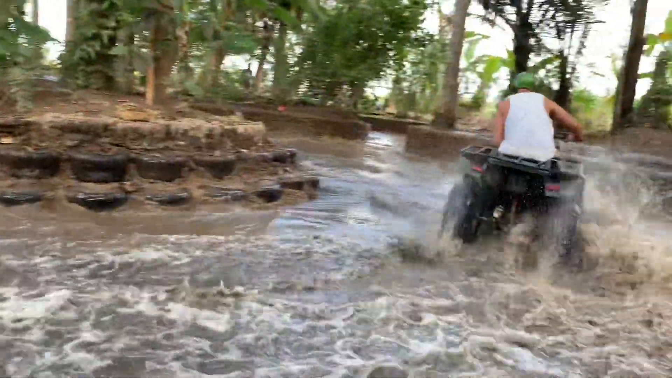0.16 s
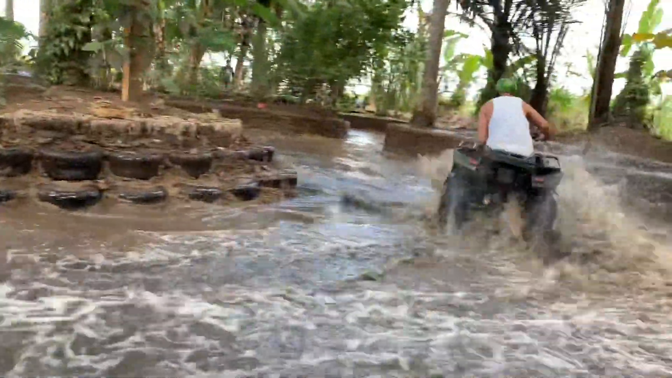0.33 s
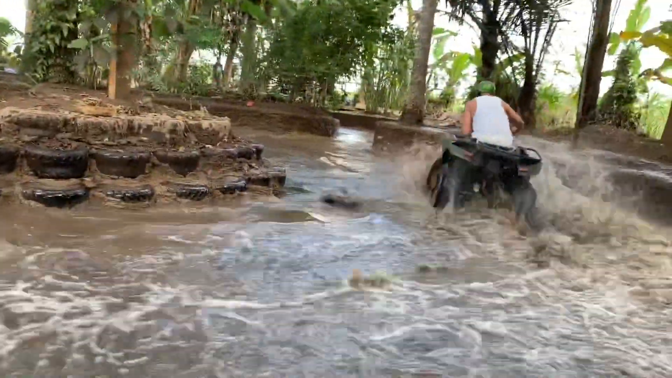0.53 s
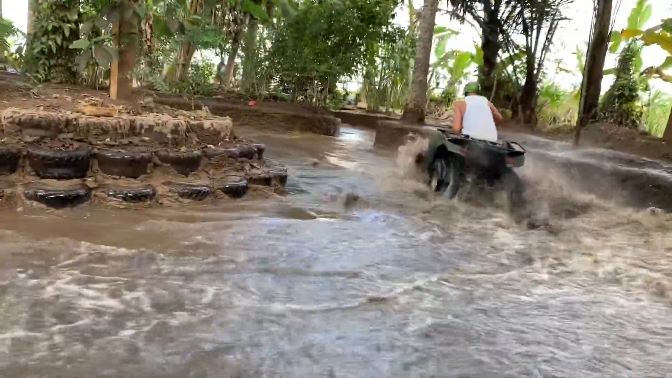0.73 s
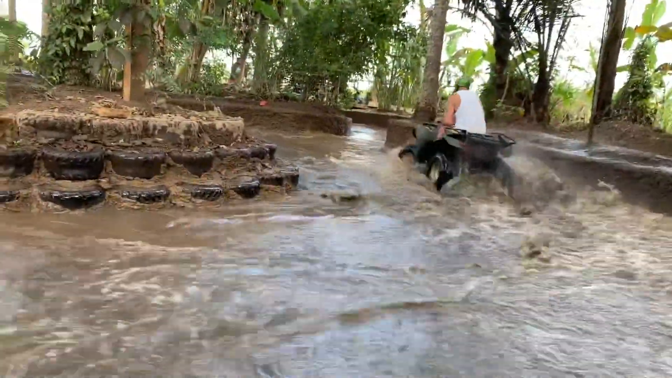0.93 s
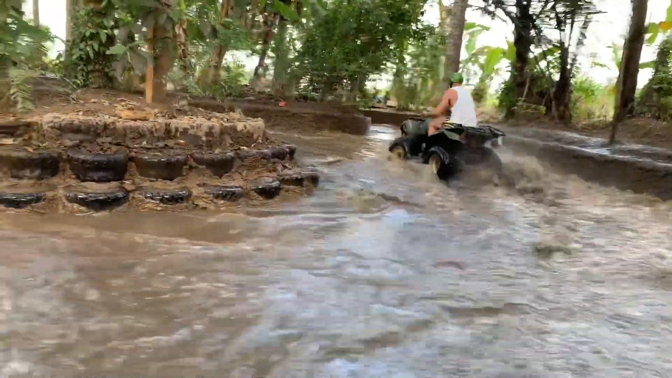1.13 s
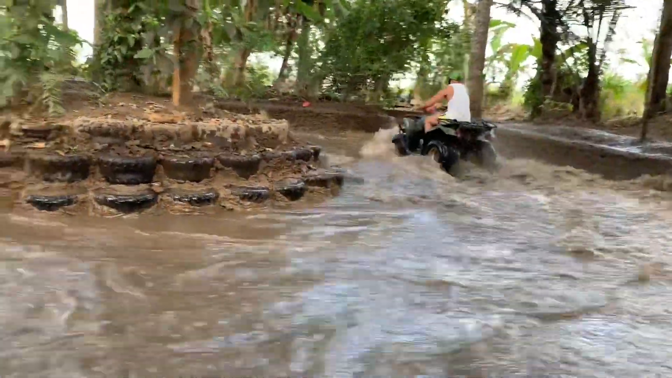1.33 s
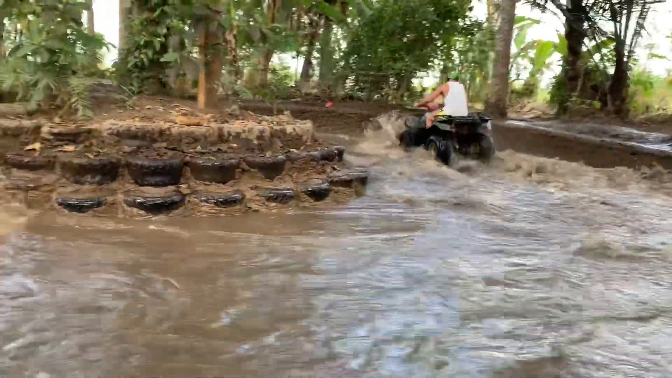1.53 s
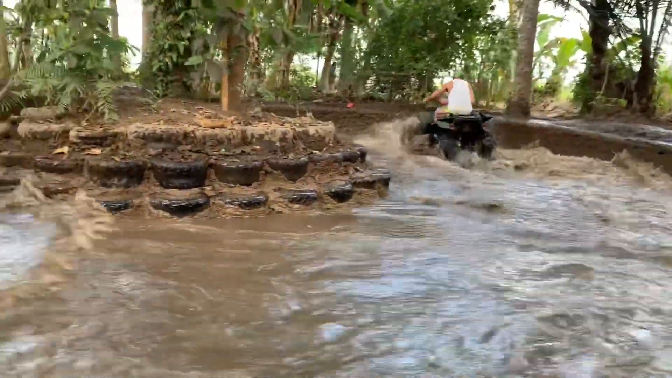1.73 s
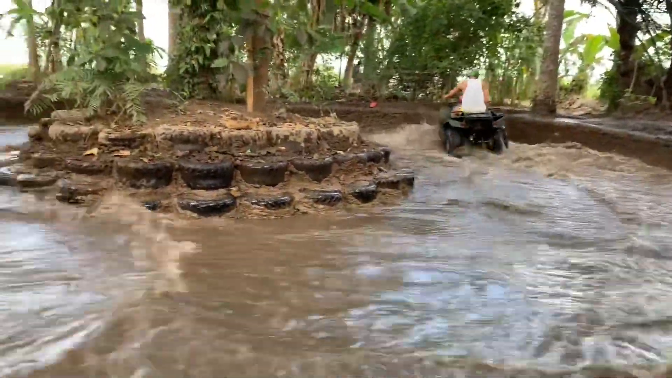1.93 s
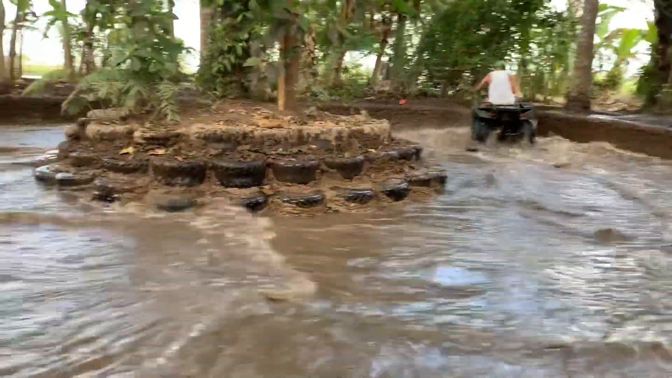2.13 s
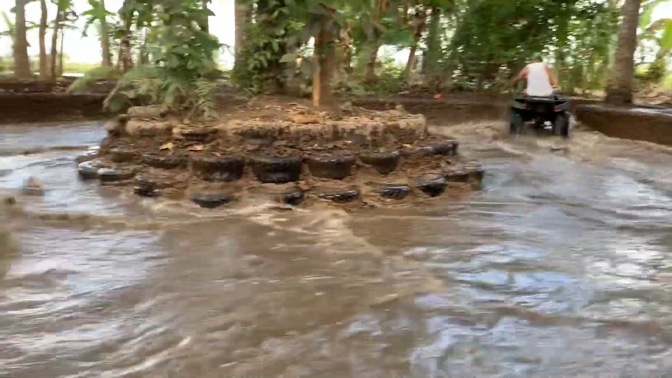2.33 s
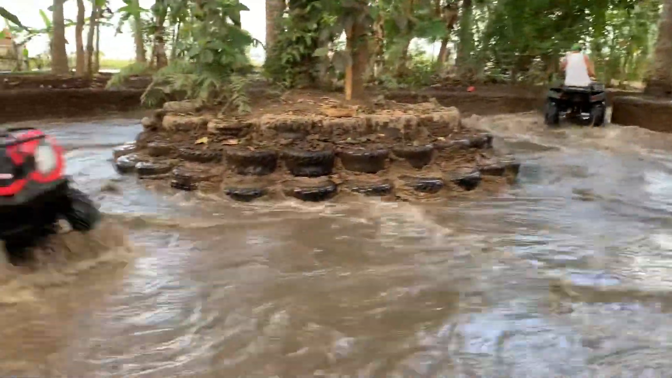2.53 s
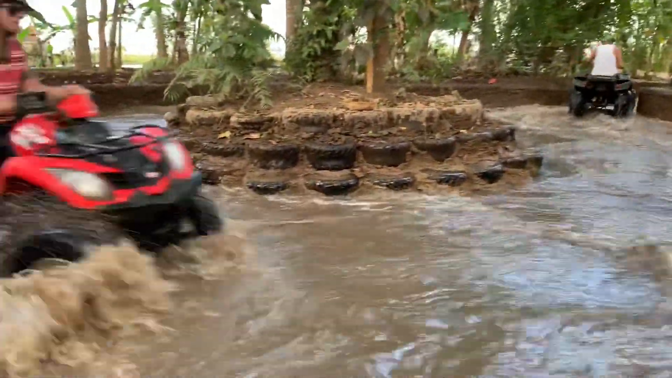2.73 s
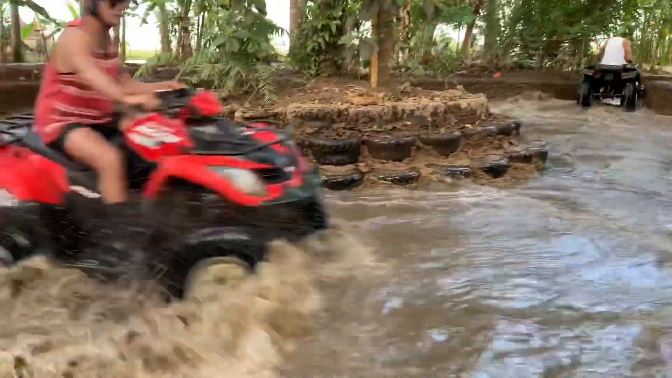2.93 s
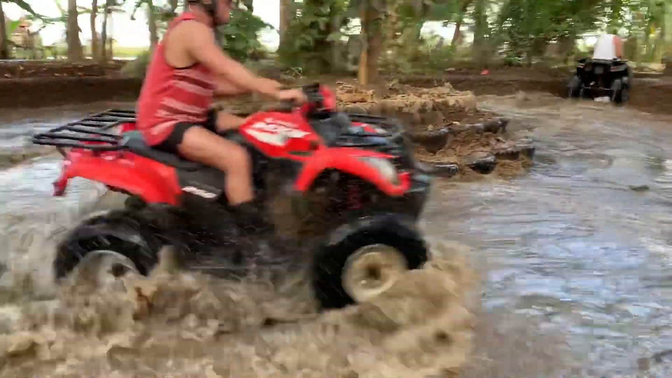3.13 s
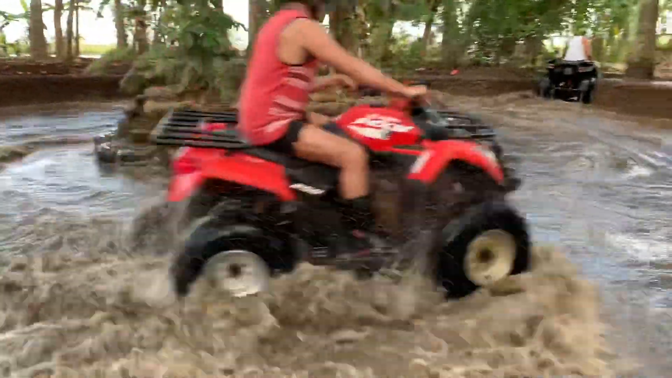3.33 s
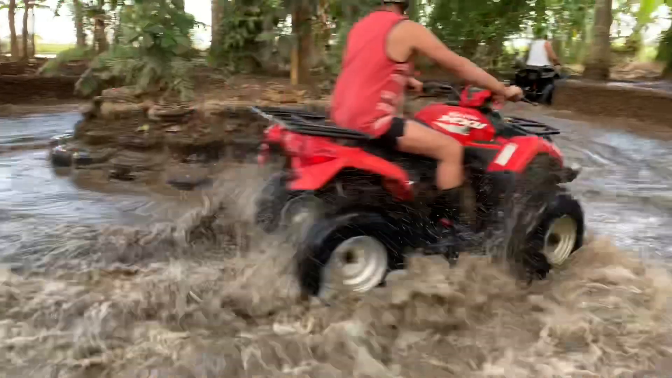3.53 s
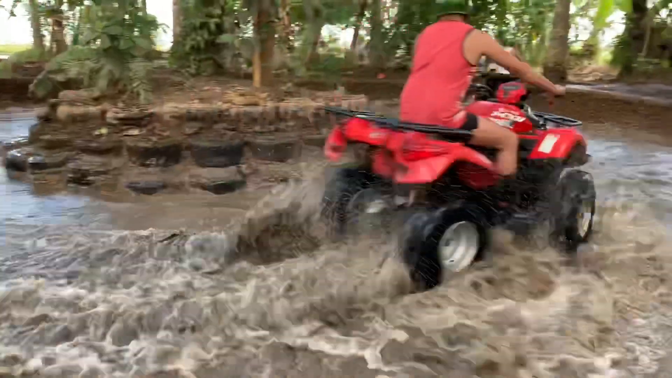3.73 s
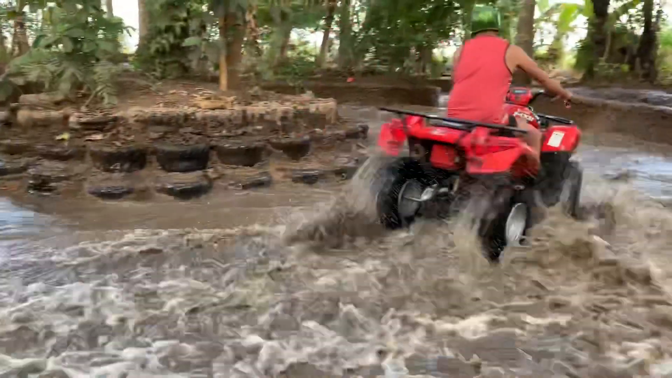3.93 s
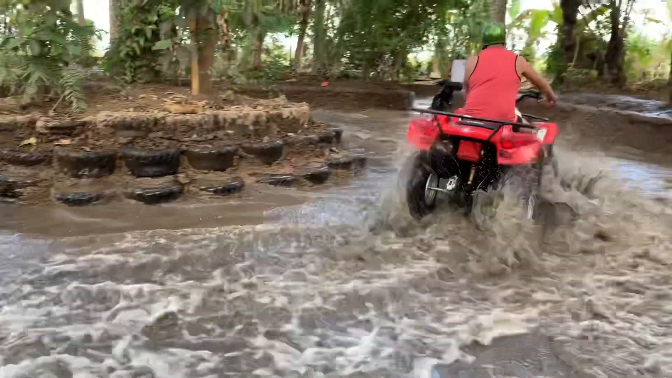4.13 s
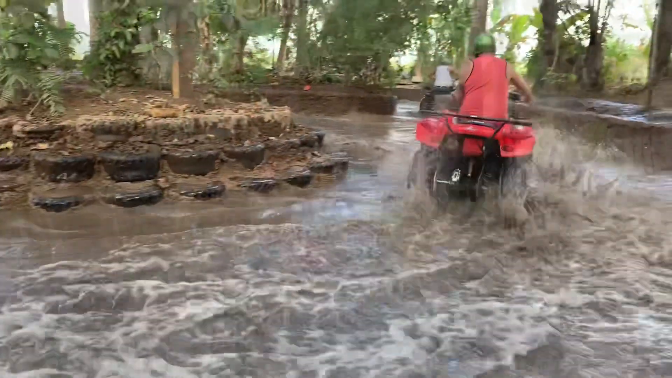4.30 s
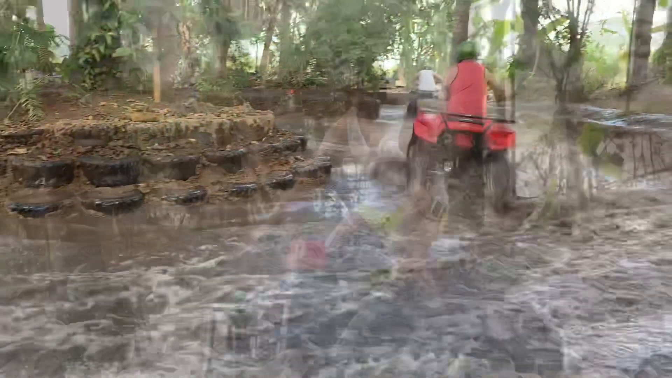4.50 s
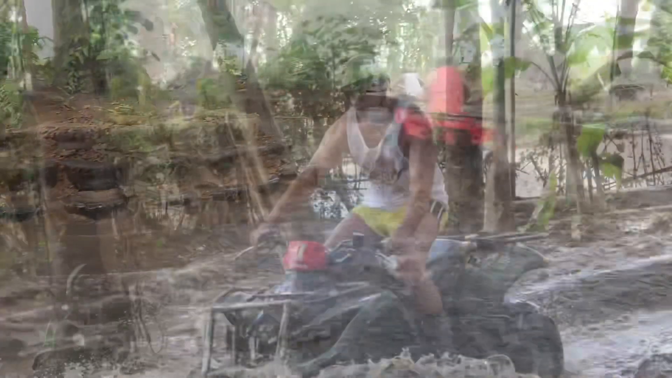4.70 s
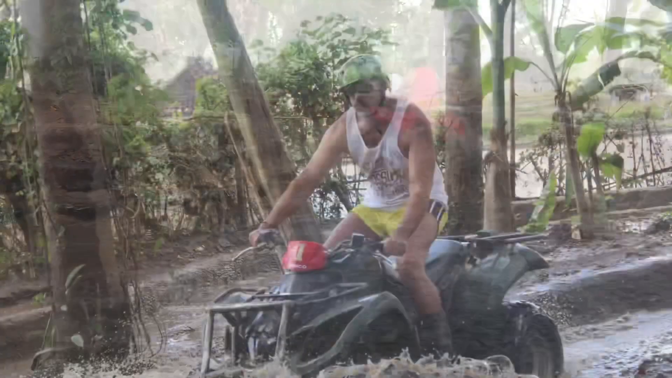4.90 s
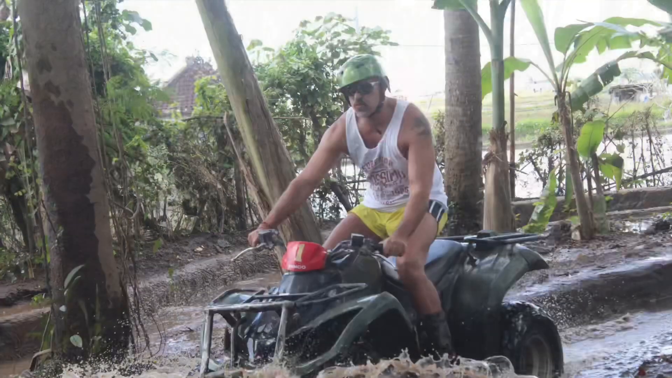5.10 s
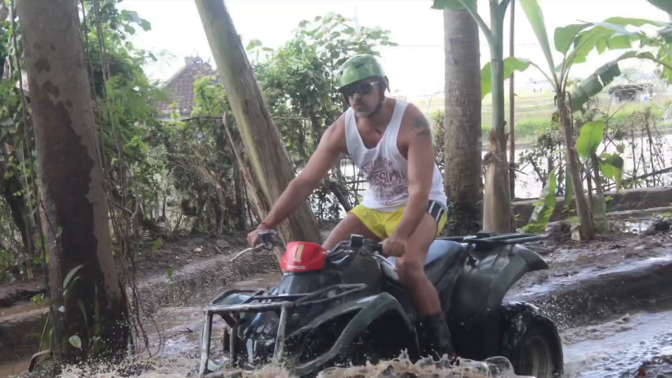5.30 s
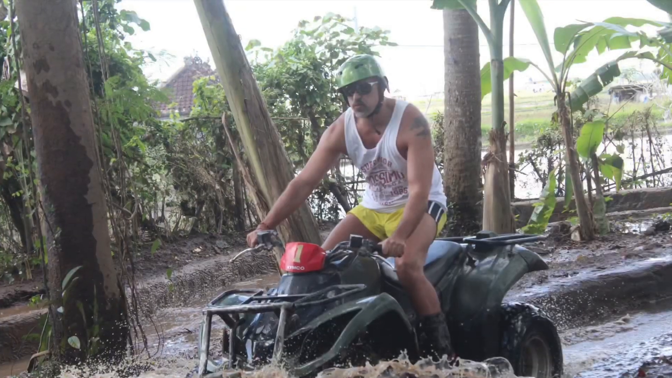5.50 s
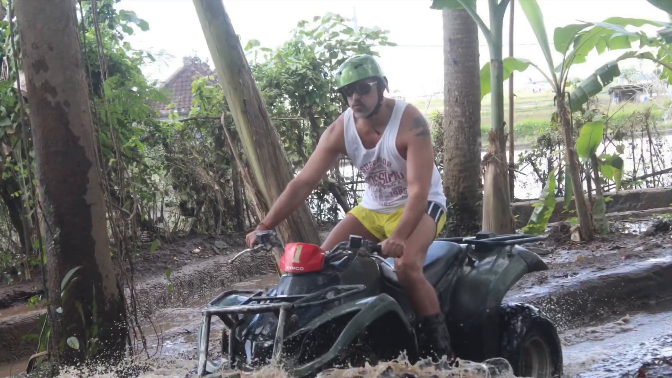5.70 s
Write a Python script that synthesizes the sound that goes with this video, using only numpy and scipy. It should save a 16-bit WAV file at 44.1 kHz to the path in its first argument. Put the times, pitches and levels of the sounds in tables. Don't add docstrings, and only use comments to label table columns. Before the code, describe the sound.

Outdoors at a muddy pool among trees, a quad bike pulls away in loud spray, its throttle shutting almost at once to a low, uneven putter. A second quad approaches, passes close around three seconds with a deep buzzing growl and heavy churning water, ticks metallically, squeals briefly and fades out. Stereo phone pickup, close and dry.

```python
import sys
import numpy as np
from scipy import signal
from scipy.fft import rfft, irfft, next_fast_len
from scipy.io import wavfile
from scipy.ndimage import uniform_filter1d, map_coordinates

SR = 44100
rng = np.random.default_rng(int(sys.argv[2]) if len(sys.argv) > 2 else 0)


def gain_from_db(level_db):
    decades = np.asarray(level_db, float) / 20
    return 10 ** decades


def unload_audio(sound):
    columns = np.transpose(np.atleast_2d(sound))
    steps = np.round(np.clip(columns, -1, 1) * 32767)
    wavfile.write(sys.argv[1], SR, steps.astype(np.int16))


N = 253575

# centre in Hz, width in Hz, level in dB.
SILENCER = [(32.6, 15, -7), (59.6, 16, 1.5), (124.7, 30.3, 0.5), (244, 51, -4.5), (430, 31, -19)]
# centre in Hz, width in Hz, level in dB.
TAILPIPE = [(35, 35, -5), (68, 36, 0.5), (140, 130, 2), (250, 70, -1), (407, 280, -10.5)]
# centre in Hz, width in Hz, level in dB.
GAS_CRACK = [(500, 400, -2), (1100, 700, 0), (2300, 900, -1), (4200, 1400, -4), (7800, 2500, -6),
             (13000, 5000, -14)]
# engine order, level in dB over the blows.
GROWL = [(5, -8), (6, -9), (7, -11), (8, -13)]
# time in seconds, firings per second.
LEAVING_SPEED = [(0, 31.4), (.19, 33.5), (.225, 33.5), (.24, 28.2), (.41, 26), (.6, 23.7), (.67, 24.1),
                 (.81, 27), (.98, 26.7), (1.12, 26.2), (1.22, 24.8), (1.4, 22.3), (1.52, 23.9),
                 (1.62, 25.2), (1.93, 25.9), (2.13, 25.5), (2.4, 24.1)]
# time in seconds, firings per second.
PASSING_SPEED = [(.6, 30.5), (.8, 31.8), (.96, 32.6), (1.1, 32.5), (1.38, 31.8), (1.86, 30.8), (2.09, 30.7),
                 (2.4, 29.1), (3.04, 30.4), (3.19, 31.5), (3.45, 32.6), (3.67, 33.5), (3.79, 35.3),
                 (3.88, 35.8), (4.23, 36), (4.59, 32.8), (4.76, 32), (5.22, 27.5)]
# time in seconds, exhaust level in dB, load from 0 (mostly drone) to 1
LEAVING_EFFORT = [(0, -18, .35), (0.221, -18, 0.8), (.24, -20.5, 0.21), (.41, -20, 0.16), (.6, -25.5, 0.04),
                  (.67, -16, 0.83), (.81, -26.5, 0.3), (.98, -26.5, .1), (1.22, -23, 0.3),
                  (1.52, -22.5, .8), (1.62, -26.5, 0), (1.93, -38, .03), (2.13, -29, 0.15), (3, -35.5, 0.6),
                  (5.3, -57.5, 0.4)]
# time in seconds, exhaust level in dB, load from 0 to 1.
PASSING_EFFORT = [(.3, -47.5, 1), (.6, -37.5, 0.022), (.8, -21, .02), (.96, -20.5, 0.39),
                  (1.38, -30, 0.048), (1.86, -18.5, 0.59), (2.09, -26, 0.06), (2.4, -17.5, 0.78),
                  (2.7, -17, 0.49), (3.04, -18.5, 0.69), (3.45, -13.5, 0.36), (3.67, -16, .2),
                  (3.79, -15, 0.28), (4.05, -16.5, 0.62), (4.3, -16, 0.53), (4.5, -16.5, 0.56),
                  (5.2, -18, 0.41)]

# frequency in Hz, level in dB per Hz.
SLOSH = [(30, -4.5), (80, 3), (200, -3), (330, -2.5), (480, -6.5), (700, -15.5), (1500, -35)]
# frequency in Hz, level in dB per Hz.
RUSH = [(400, -33), (750, -5), (1100, -4), (1600, -6.5), (2200, -21), (3500, -62)]
# frequency in Hz, level in dB per Hz.
HISS = [(1200, -24.5), (1800, -2), (2100, 2), (2600, -1.5), (2850, -9.5), (4000, -43)]
# frequency in Hz, level in dB per Hz.
FIZZ = [(2000, -36.5), (3000, 1), (4000, 1), (6000, -4.5), (7800, -1.5), (10300, -2.5), (13000, -23.5),
        (16000, -24.5)]
# frequency in Hz, level in dB per Hz.
MIST = [(8000, -41.5), (11000, 3.5), (13500, -1.5), (16000, 4.5)]
# level in dB, share of the churn, share of the wave's
REGISTERS = [(-22, 0.37, 0.45, 0.4), (-31, 0.77, 0.18, -1.3), (-35, .55, .05, 1.6),
             (-32.5, 0.27, 0.13, -0.22)]
# time in seconds, length in seconds, slap in dB, spray in dB.
WAVES = [
    (.08, 0.087, -0.5, 0.5),
    (1.3, 0.27, 1, 1.6),
    (2.75, 0.17, -2.5, -1),
    (.27, 0.085, 6.5, 0.5),
    (0.954, 0.23, 12, 2),
    (2.25, 0.57, 4.5, 3),
    (3.08, .16, 5, -2),
    (3.58, 0.15, -2.3, -0.5),
    (4.18, 0.084, -1, 0.1),
    (4.47, 0.057, 9, .3),
]
# time in seconds, peak in dB, pitch in Hz.
POCKETS = [(0.064, -16.5, 2300), (0.188, -20.5, 1150), (0.208, -11, 1030), (0.698, -22.5, 1350),
           (0.729, -23, 1390), (1.013, -16, 504), (1.179, -17, 420), (1.182, -15.5, 693),
           (1.779, -18.5, 754), (1.783, -7.5, 400), (2.101, -32, 2590), (2.124, -30.5, 746),
           (3.13, -5, 370), (3.134, -17.5, 870), (3.149, -18.5, 990), (3.164, -5.5, 330),
           (3.313, -15.5, 726), (3.374, -17, 915), (3.67, -22, 1170), (3.878, 3.5, 466),
           (3.879, -15.5, 1210), (4.263, -3.5, 460), (4.987, -10.5, 480)]
# centre in Hz, width in Hz, level in dB.
ARCHES = [(1338, 130, -2.5), (1805, 210, -4)]
# time in seconds, peak in dB.
TICKS = [
    (0.327, -21),
    (3.7234, -23.5),
    (3.7509, -28.5),
    (3.919, -23.5),
    (3.947, -16),
    (3.976, -16.5),
    (4.003, -33.5),
    (4.1974, -31),
    (4.254, -21),
    (4.2827, -31.5),
]

# delay in seconds, gain.
BANKS = [(.0075, 0.026), (0.017, -0.075)]
# frequency in Hz, likeness from 0 to 1, right port's lead in radians.
PORTS = [(60, .99, 0), (300, .91, -.1), (2000, .42, .6), (4100, .33, -.2), (5600, .3, 0), (7100, .93, 0),
         (9850, 1, 0)]
# frequency in Hz, left over right in dB.
LEAN = [(60, -1.8), (200, -2.3), (700, .5), (1300, 1.2), (3100, 1.6), (4300, -1.4), (5900, -4), (7500, 0)]
# frequency in Hz, half width in Hz, #
FLIPS = [(4850, 750, 0), (6350, 750, 0), (8950, 900, .33), (12100, 1050, .45), (15250, 1000, .55)]

SHUT_S = .215


def clock():
    return np.arange(N) / SR


def unit(x):
    return x / np.sqrt(np.mean(x ** 2) + 1e-20)


def along(points, hz):
    f, v = np.transpose(points)
    return np.interp(np.log(hz + 1), np.log(f + 1), v)


def curves(rows):
    s, *cols = np.transpose(rows)
    return [np.interp(clock(), s, c) for c in cols]


def wobble(rate):
    knots = rng.standard_normal(int(N * rate / SR) + 4)
    return map_coordinates(knots, [np.arange(N) * rate / SR])


def filtered(x, response):
    m = next_fast_len(N + SR // 2)
    return irfft(rfft(x, m) * response(np.fft.rfftfreq(m, 1 / SR)), m)[..., :N]


def resonant(x, modes, order=1):
    def response(f):
        total = 0
        for k, (centre, width, db) in enumerate(modes):
            band = 1j * f * width / (centre * centre - f * f + 1j * f * width)
            total = total + (-1) ** k * gain_from_db(db) * band
        return total ** order
    return unit(filtered(x, response))


def rush(spectrum, patchy_db):
    z = signal.stft(rng.standard_normal(N + 512), nperseg=512)[2]
    patches = uniform_filter1d(uniform_filter1d(rng.standard_normal(z.shape), 4, 0), 6, 1)
    noise = signal.istft(z * gain_from_db(patchy_db * unit(patches)), nperseg=512)[1][:N]
    return unit(filtered(noise, lambda hz: gain_from_db(along(spectrum, hz))))


def bubble(hz, t60, length, rise=0.28):
    t = np.arange(length) / SR
    swell = gain_from_db(-60 * t / t60) * (1 - np.exp(-t * hz))
    return swell * np.sin(2 * np.pi * hz * t * (1 + rise * t / t60))


def engine(speed, effort, jet, tone, shut_db, settled, fires_at_s, jitter_s, scatter_db):
    blows_db, load = curves(effort)
    load = np.clip(load, 0, 1)
    aimed_s, jet_db, beam_s = jet
    faces_s, tone_s, open_share = tone
    unsteady = np.interp(clock(), (2.4, 2.9, 4.4, 4.7), [1, settled, settled, 1])
    drone_db = blows_db + 8.5 - 27.5 * load

    off_beam = (clock() - aimed_s) / beam_s * np.where(clock() > aimed_s, 1.4, 1)
    crack_db = jet_db - 14.5 * np.log10(1 + off_beam ** 2) + shut_db * (clock() > SHUT_S)
    facing = np.clip((open_share + load) / (1 + ((clock() - faces_s) / tone_s) ** 2), 0, 1)

    cycles = np.cumsum(curves(speed)[0]) / SR
    cycles = cycles - cycles[round(fires_at_s * SR)]
    firings = np.flatnonzero(np.diff(np.floor(cycles)))
    chance = rng.standard_normal((200, 3))[:len(firings)]
    late = np.round(jitter_s * SR * chance[:, 0]).astype(int)
    at = np.clip(firings + late, 0, N - 1)

    blows = -np.bincount(at, gain_from_db(scatter_db * chance[:, 1]), N)
    through_body = np.sqrt(1 - facing) * resonant(blows, SILENCER, order=2)
    from_pipe = np.sqrt(facing) * resonant(blows, TAILPIPE, order=2)
    drone_phase = 4 * 2 * np.pi * cycles + .85 * unsteady * wobble(12)
    drone = gain_from_db(3 * unsteady * wobble(18)) * np.sqrt(2) * np.sin(drone_phase)
    growl = np.sqrt(facing) * sum(gain_from_db(db) * np.sin(k * 2 * np.pi * cycles - 2.6) for k, db in GROWL)

    jets = np.bincount(at, gain_from_db(2.2 * np.clip(chance[:, 2], -2, 1.3)), N)
    t = np.arange(SR // 20) / SR
    puff = gain_from_db(-60 * t / .03) * (1 - np.exp(-t / .0004))
    gate = signal.fftconvolve(jets, puff)[:N]
    crack = resonant(gate * rng.standard_normal(N), GAS_CRACK)
    return gain_from_db(blows_db) * (through_body + from_pipe + growl) + gain_from_db(drone_db) * drone + gain_from_db(crack_db) * crack


def churn(closest_s, speed, closest_m):
    past_m = speed * (clock() - closest_s)
    away_m = np.hypot(past_m, closest_m)
    return gain_from_db(11.5 * (1 + past_m / away_m)) / away_m ** 2


def droplets(count, centre_hz, cycles, spread_db):
    u, g = rng.random((count, 2)), rng.standard_normal(count)
    hz = np.clip(centre_hz * np.exp(0.45 * g), 150, 15000)[:, None]
    gain = gain_from_db(-spread_db * np.log(1 - .96 * u[:, 1:]))
    rows = bubble(hz, cycles / hz, length=700) * gain
    at = (u[:, :1] * N).astype(int) + np.arange(700)
    return unit(np.bincount(at.ravel(), rows.ravel(), N)[:N])


def water():
    spinning = np.clip((SHUT_S + .04 - clock()) / .04, 0, 1)
    leaving = churn(closest_s=-0.47, speed=4.98, closest_m=0.44) * gain_from_db(2 * 5 * spinning)
    passing = churn(closest_s=3.29, speed=3.05, closest_m=1.93)
    churn_db = 10 * np.log10(leaving + passing)
    slap_db, spray_db = sum(np.outer(db, np.exp(-((clock() - s) / length) ** 2)) for s, length, *db in WAVES)
    slosh_db, rush_db, hiss_db, fizz_db = (
        db + grows * churn_db + slap * slap_db + spray * spray_db for db, grows, slap, spray in REGISTERS)
    surge = wobble(7)

    plops = droplets(count=500, centre_hz=451.5, cycles=15, spread_db=-1)
    slosh = gain_from_db(slosh_db + 1.0 * surge) * (1.004 * rush(SLOSH, patchy_db=-2.5) + 0.27 * plops)
    drips = droplets(count=1200, centre_hz=1153, cycles=17, spread_db=10.5)
    sheet = gain_from_db(rush_db + 5.5 + 0.2 * surge) * (0.64 * rush(RUSH, patchy_db=2.5) + 0.21 * drips)
    patter = droplets(count=1500, centre_hz=2430, cycles=5.1, spread_db=11.0)
    hiss = gain_from_db(hiss_db + 4) * (0.76 * rush(HISS, patchy_db=2.0) + 0.21 * patter)
    sparkle = droplets(count=4000, centre_hz=6650, cycles=2.4, spread_db=7)
    fizz = gain_from_db(fizz_db + 0.19 * wobble(20)) * (1.047 * rush(FIZZ, patchy_db=0.0) + 0.41 * sparkle)
    return slosh + sheet + hiss + fizz


def gulps():
    out = np.zeros(N + SR)
    for s, db, hz in POCKETS:
        t60 = .036 - .0009 * (db + 15.5)
        gulp = bubble(hz, t60, length=SR // 5, rise=0.075 * (hz < 2000))
        out[round(s * SR):][:SR // 5] += gain_from_db(db + 3.0) * gulp
    return out[:N]


def whirl():
    shape = np.interp(clock(), np.cumsum([0.23, .15, 0.81, 0.18]), [0, 1, 1, 0])
    return shape * gain_from_db(-34 + 2.1 * wobble(20)) * resonant(rng.standard_normal(N), ARCHES)


def bracket():
    out = np.zeros(N + SR)
    for s, db in TICKS:
        hz = 4010 * (1 + .015 * rng.standard_normal())
        out[round(s * SR):][:SR // 5] += gain_from_db(db + 3.0) * bubble(hz, t60=.019, length=SR // 5, rise=0)
    return out[:N]


def mist():
    coming_db = 9 * (2.75 - clock())
    going_db = 22 * (clock() - 3.7)
    level_db = -34.5 - np.maximum(0, np.maximum(coming_db, going_db))
    return gain_from_db(level_db) * rush(MIST, patchy_db=-1.5)


def belt():
    hz = 1065 + 6200 * np.clip(clock() - 4.42, 0, .4) ** 2
    shape = np.interp(clock(), np.cumsum([4.36, .11, .05, .15]), [0, 1, 1, 0])
    phase = 2 * np.pi * np.cumsum(hz * (1 + .04 * wobble(140))) / SR
    return shape * gain_from_db(-26 + 3 + 2.5 * wobble(80)) * np.sin(phase)


def banks(x):
    def response(hz):
        return 1 + sum(g * np.exp(-2j * np.pi * hz * s) / (1 + 1j * hz / 1500) for s, g in BANKS)
    return filtered(x, response)


def ports(x):
    f, like, lead = np.transpose(PORTS)
    z = signal.stft(x, nperseg=768)[2]
    scattered = signal.istft(z * np.exp(2j * np.pi * rng.random(z.shape)), nperseg=768)[1][:N]
    scattered = unit(scattered) * np.std(x)

    def split(hz):
        lost = sum(dip * np.clip(1 - np.abs(hz - c) / w, 0, 1) for c, w, dip in FLIPS)
        angle = np.arccos(np.interp(hz, f, like) * (1 - lost)) / 2
        return np.array([np.cos(angle), np.sin(angle)])

    def sides(hz):
        turned = sum(np.pi * np.clip((hz - c + w) / (2 * w), 0, 1) for c, w, _ in FLIPS)
        left = gain_from_db(along(LEAN, hz) / 2) * np.exp(-.5j * (np.interp(hz, f, lead) + turned))
        return np.array([left, 1 / left])

    direct, diffuse = filtered(np.array([x, scattered]), split)
    return filtered(np.array([direct + diffuse, direct - diffuse]), sides)


def scene():
    # faces us at s, beam s, open share unloaded
    leaving = engine(LEAVING_SPEED, LEAVING_EFFORT, jet=(.13, -24, .25), tone=(.08, 2.6, 0.44),
                     shut_db=-12, settled=1, fires_at_s=.126, jitter_s=.0005, scatter_db=1.6)
    passing = engine(PASSING_SPEED, PASSING_EFFORT, jet=(3.82, -29, .25), tone=(4.15, 0.744, 0.04),
                     shut_db=0, settled=.25, fires_at_s=3.863, jitter_s=.0003, scatter_db=1.3)
    pool = water() + gulps() + whirl() + mist()
    return ports(banks(leaving + passing) + pool + bracket() + belt())


def roll_off(x):
    return signal.sosfilt(signal.butter(12, 15720, fs=SR, output="sos"), x)


def record(dry):
    limited = dry / (1 + np.abs(dry / .99) ** 6) ** (1 / 6)
    fade = np.clip((5.225 - clock()) / 1, 0, 1) ** 1.15
    return roll_off(limited * fade)


dry = scene()
out = record(dry)
unload_audio(out)
```